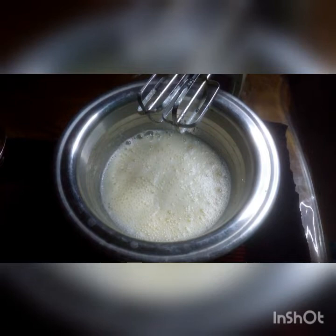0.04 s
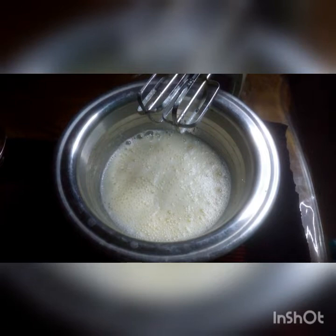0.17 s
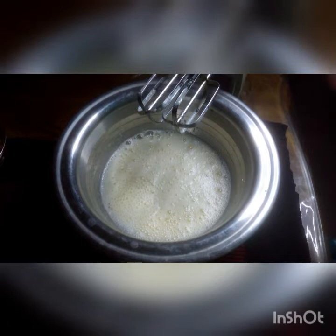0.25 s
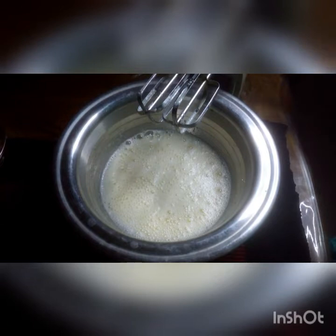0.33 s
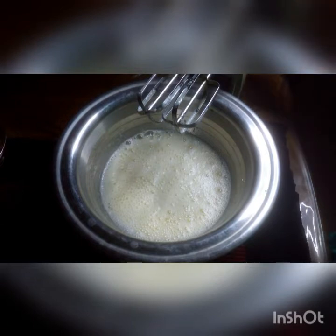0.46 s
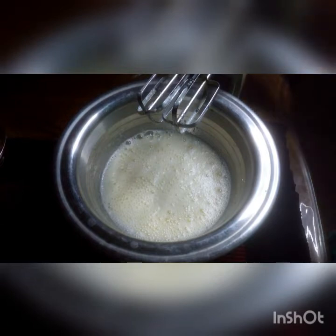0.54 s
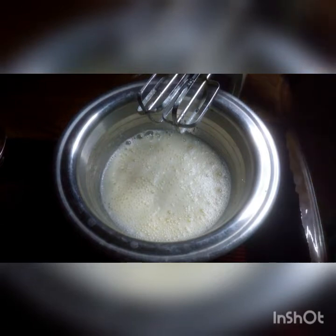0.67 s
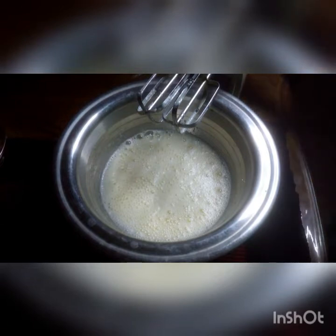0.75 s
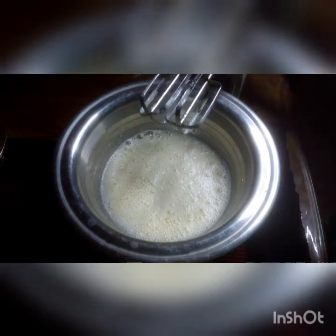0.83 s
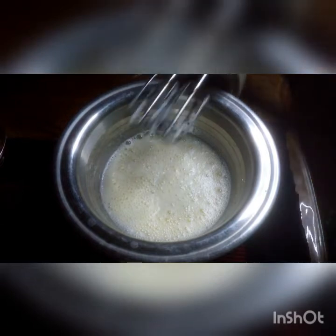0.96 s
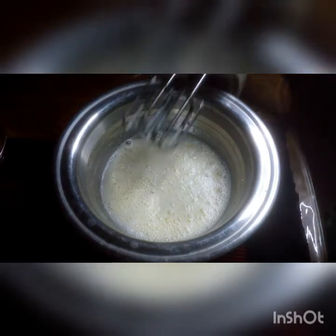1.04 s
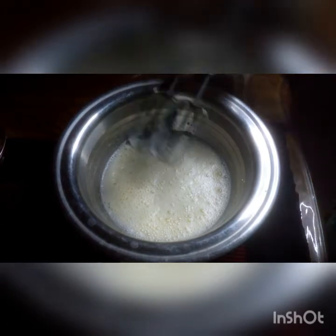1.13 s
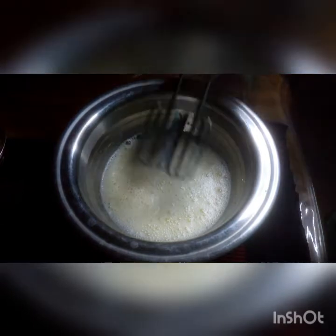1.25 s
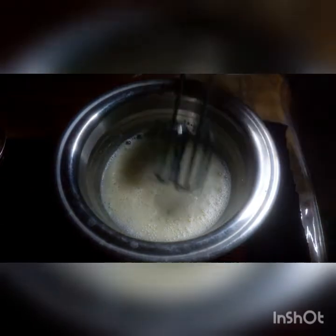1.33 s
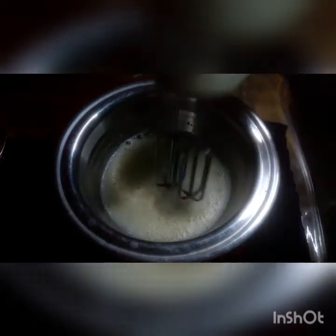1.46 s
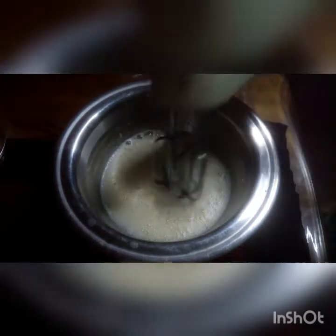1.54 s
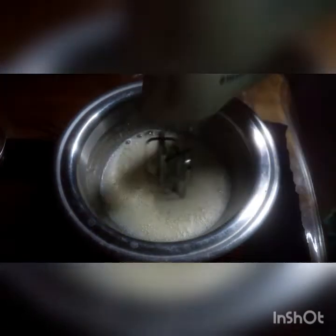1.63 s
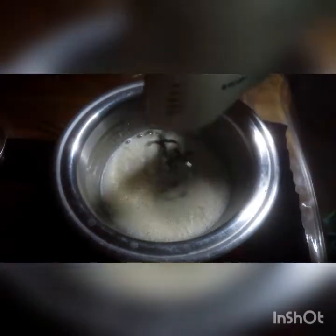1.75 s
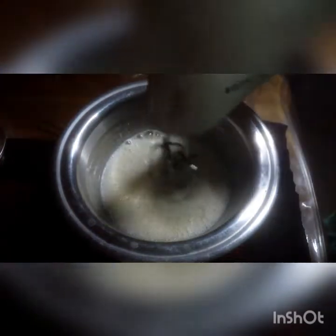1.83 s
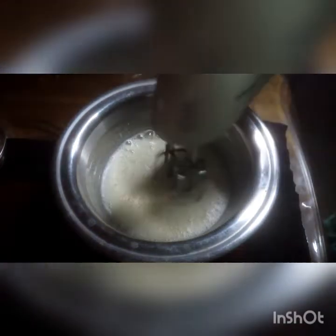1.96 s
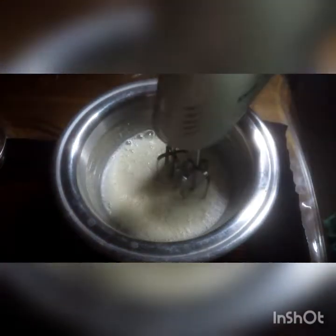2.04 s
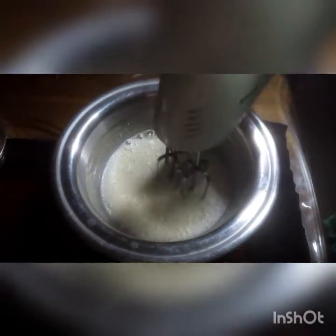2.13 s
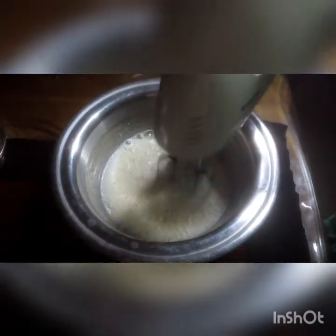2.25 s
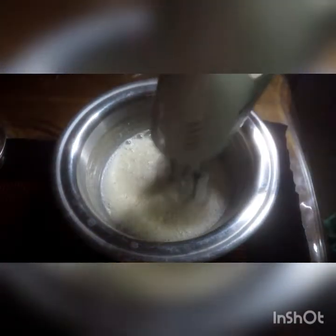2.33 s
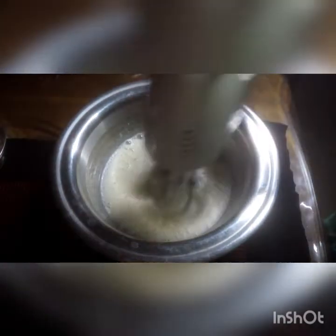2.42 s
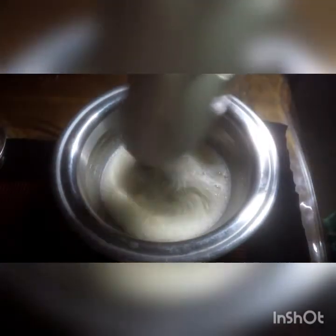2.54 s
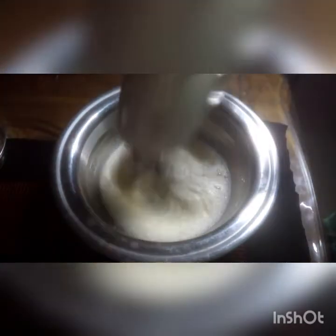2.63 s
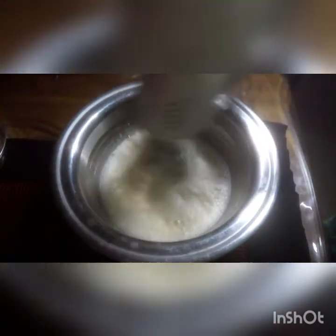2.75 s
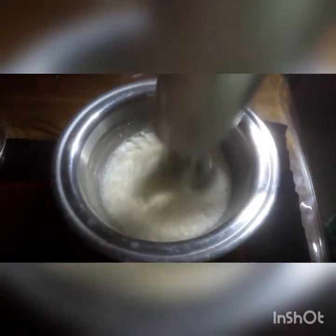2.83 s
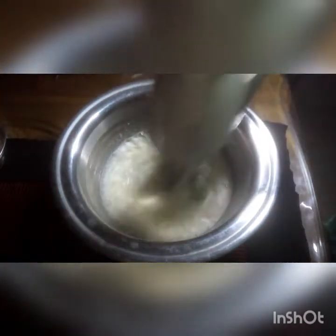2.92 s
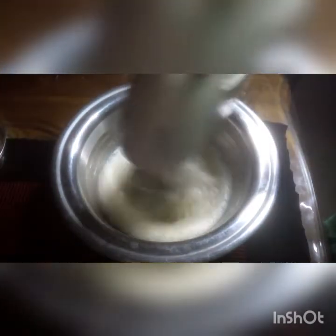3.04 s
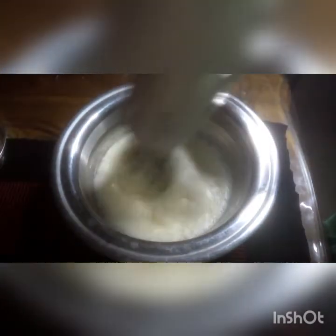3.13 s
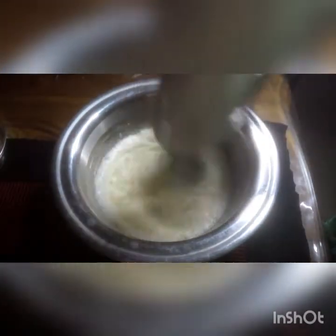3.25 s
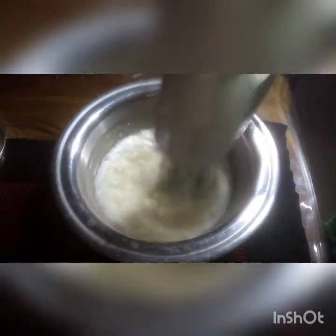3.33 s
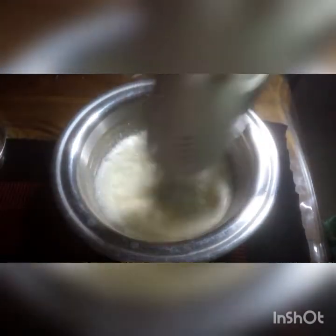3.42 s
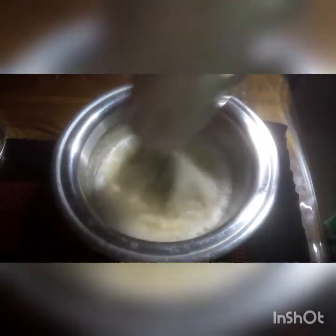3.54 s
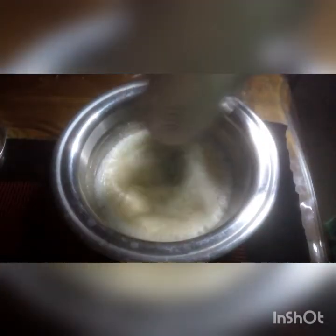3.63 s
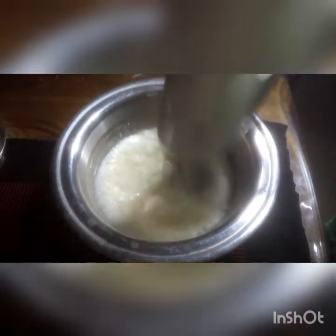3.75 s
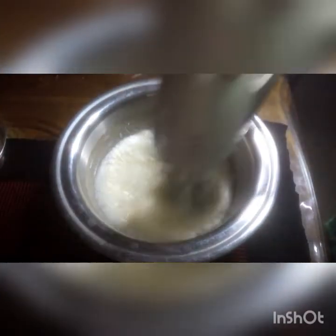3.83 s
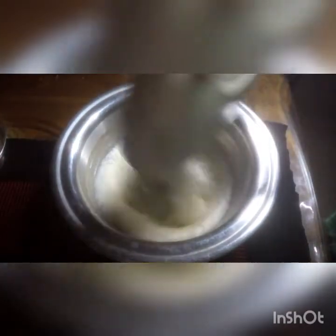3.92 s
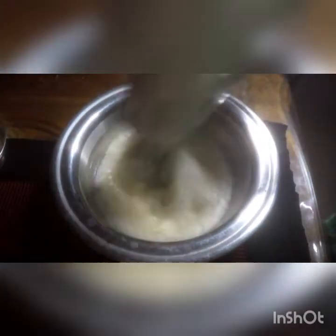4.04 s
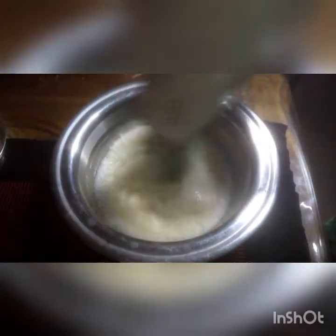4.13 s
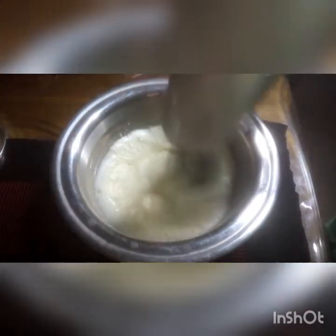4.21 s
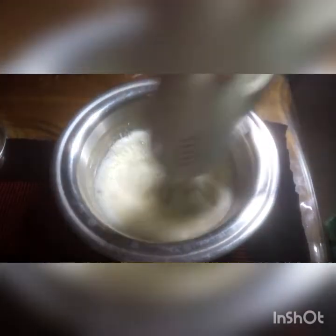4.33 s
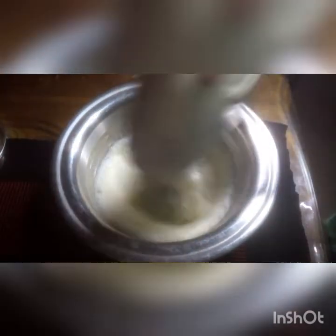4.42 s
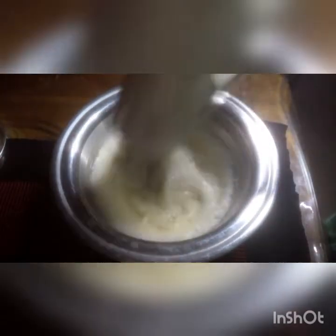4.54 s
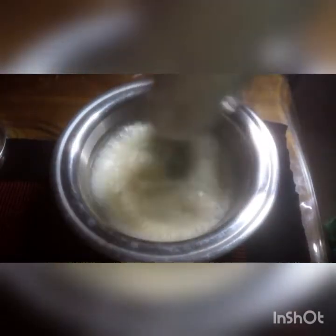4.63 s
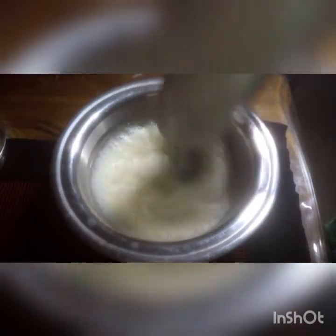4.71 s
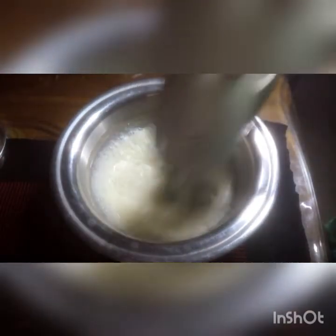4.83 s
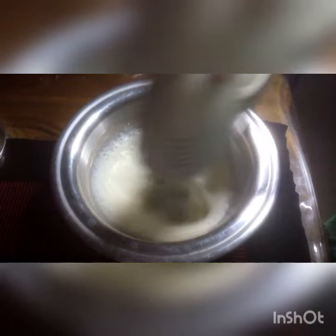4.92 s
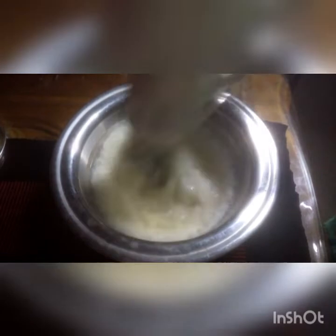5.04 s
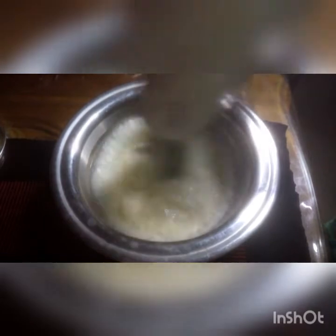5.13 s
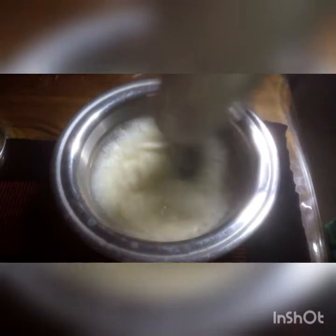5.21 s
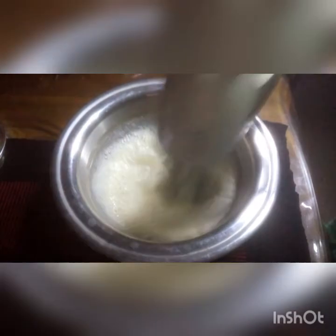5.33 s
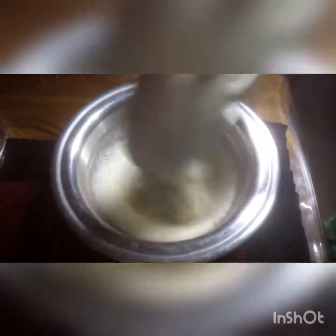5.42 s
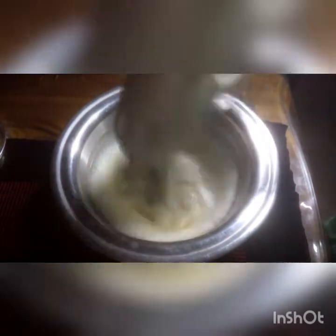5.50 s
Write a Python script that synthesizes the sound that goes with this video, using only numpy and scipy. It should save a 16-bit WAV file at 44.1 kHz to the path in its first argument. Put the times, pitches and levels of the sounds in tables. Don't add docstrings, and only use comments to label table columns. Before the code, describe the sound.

A quiet kitchen with a faint low hum, heard close by a phone, brighter on the left. Right at the start comes a short knock, then small latch clicks and little squeaky rings at about 0.2 to 0.3 s. Soft sleeve and cable rustle and dull bumps through the counter follow sparsely until about 1.9 s, with faint thin singing of beater wires. At 1.94 s the beaters land on the steel bowl with a solid clunk, then more clatter and a low rocking to 2.25 s. Around 2.3 s a hard switch snap, the loudest knock, starts the motor: a rough buzzing whine leaps upward, then climbs more slowly to near full speed by about 4 s. The roar of gear rattle, churned runny batter and cooling air stays loud, with hissy treble, hollow howling and whine tones wavering as the mixer moves. It is still running at the end, about 5.6 s.

```python
import sys
import numpy as np
from scipy import signal
from scipy.fft import rfft, irfft
from scipy.io import wavfile
from scipy.ndimage import uniform_filter1d

SR = 44100
rng = np.random.default_rng(int(sys.argv[2]) if len(sys.argv) > 2 else 0)


def digitize_waveform(pressure):
    field = np.atleast_2d(pressure).T
    bounded = np.clip(field, -1, 1)
    quanta = np.round(bounded * 32767).astype(np.int16)
    wavfile.write(sys.argv[1], SR, quanta)


def boost_factor(decibels):
    exponent = np.asarray(decibels, float) / 20
    return 10 ** exponent


N = 245637
T = np.arange(N) / SR
HZ = np.fft.rfftfreq(N, 1 / SR)

BLADES, SLOTS = 9, 12
MAINS_HZ, START_S, FULL_HZ = 50, 2.33, 354.7
JOLT_S, JOLT_RISE_DB_S, JOLT_FALL_DB_S = 2.31, 523, 173
TOP_HZ, LEAD_S = 15550, 4.5e-5

# (frequency [Hz], density [dB per Hz])
KITCHEN_SHAPE = [(15, -49), (40, -8), (60, -1), (226, 0.5), (347, -15), (376, -12), (678, -25), (887, -50),
                 (1010, -16), (1130, -50), (4560, -30), (15200, -58)]
# (frequency [Hz], density [dB per Hz])
RUSTLE_SHAPE = [(180, 0.5), (300, 4), (404, -2), (553, 1), (1190, -5), (1940, -6.5), (3620, -10),
                (4810, -10.5), (9000, -31.5), (11700, -65), (19800, -120)]
# (frequency [Hz], width [Hz], level [dB])
SCRAPE_MODES = [(537, 59, -2), (1440, 210, 0), (2500, 140, -7), (4850, 120, -8)]
# (time [s], length [s], level [dB])
STROKES = [(0.04, 0.18, -61), (.27, 0.12, -62), (.71, 0.067, -58.5), (1.4, 0.05, -64.5),
           (1.55, 0.07, -58.5), (1.68, 0.059, -57.5), (1.94, 0.26, -60.5)]
# (time [s], length [s], level [dB])
BUMPS = [(0, .01, -55), (.05, 0.12, -53.5), (.27, 0.18, -51.5), (.73, 0.1, -52), (.9, 0.26, -55),
         (1.25, 0.02, -55), (1.38, 0.13, -55.5), (1.56, 0.088, -53.5), (1.86, 0.014, -55),
         (1.95, 0.18, -50.5), (2.24, .1, -51)]
# (frequency [Hz], width [Hz], level [dB])
COUNTER_MODES = [(116, 20, -5), (172, 27, 1), (226, 38, -8.5), (347, 39, -17)]
# (frequency [Hz], frequency [Hz])
WIRES_HZ = (5790, 3257)
# (time [s], length [s], level [dB])
SING_HIGH = [(1.245, 0.12, -70), (1.41, .06, -76), (1.79, 0.065, -74), (1.89, .02, -74), (2.0, .1, -82)]
# (time [s], length [s], level [dB])
SING_LOW = [(1.76, .03, -82), (1.86, .24, -77)]
# (time [s], peak [dB], thud [Hz], crack [dB])
KNOCKS = [(0.05, -59, 1750, -8), (0.0598, -26.5, 1310, -12), (0.182, -53, 1710, 5),
          (0.1845, -41.5, 2000, -0.5), (0.219, -58, 1500, -1), (0.2765, -49, 2400, 8),
          (0.285, -62, 2400, 0), (0.304, -55, 1810, -7), (0.313, -55, 497, 2), (0.327, -59, 497, 4),
          (1.887, -51, 700, -17), (1.915, -53, 549, -30), (1.931, -39, 1170, -19), (1.942, -20.5, 774, -18),
          (2.033, -30.5, 620, -20), (2.049, -37, 1150, -17), (2.132, -48, 1410, -16),
          (2.142, -34.5, 1380, -9.5), (2.17, -44, 850, -19), (2.247, -34.5, 800, -24),
          (2.27, -32.5, 726, -1), (2.288, -26.5, 714, -25), (2.299, -15, 1180, -16),
          (2.304, -18, 1100, -14), (2.309, -9, 662, -21.5)]
# (time [s], peak [dB])
TICKS = [
    (0.184, -48),
    (0.275, -51),
    (1.943, -62),
]
# (time [s], frequency [Hz], level [dB], t60 [s])
SQUEAKS = [(0.0, 1750, -65, .4), (0.186, 10300, -63, .12), (0.186, 11200, -67, .12),
           (0.186, 13700, -66, .05), (0.279, 10200, -67, 0.1), (0.279, 11000, -71, 0.1),
           (0.2, 2470, -64, 0.3), (0.279, 2440, -61, 0.41), (.285, 1670, -58, .25), (.29, 920, -62, .3),
           (.303, 1500, -61, .3), (.305, 1900, -57, .08), (.33, 410, -55, .2), (0.69, 4740, -57, 0.16),
           (2.033, 5520, -56, 0.035), (2.143, 3150, -47, 0.033)]
# (frequency [Hz], level [dB], t60 [s])
LATCH_MODES = [(480, -14, .12), (900, -10, .14), (1340, -4, .07), (1475, -9, .12), (1750, -14, .1),
               (2200, -1, .035), (2400, -9, .1), (2700, -3, .025), (3257, 2, .035), (3700, 4, .022),
               (4290, -2, .03), (5701, -13, .025), (6300, -15, .05)]
# (frequency [Hz], level [dB], t60 [s])
STEEL_MODES = [(563, -6.5, 0.28), (634, -9, 0.1), (820, -13, 0.07), (1060, -7, 0.039), (1518, -14, 0.092),
               (2170, -13.5, 0.25), (3300, -23, 0.18), (5110, -15, 0.064), (5840, -24, .12),
               (6600, -20, .07)]
# (frequency [Hz], width [Hz], level over roar [dB])
HOUSING_MODES = [(157, 15, 4.5), (297, 36, -2.5), (430, 33, -2.5), (547.5, 19, 5.5), (651, 38, 7),
                 (712, 18, -1), (1104, 108, 8), (1942, 65, -1), (2576, 166, 7), (3063, 190, 5.5)]
# (time [s], length [s], level [dB])
ROCKS = [(1.95, .02, -52), (1.99, .03, -51), (2.04, 0.064, -53.5), (2.14, .08, -56)]
# (frequency [Hz], width [Hz], level [dB])
BRUSH_BANDS = [(9000, 880, -59), (10400, 1800, -58.5), (11470, 1100, -60.5), (12270, 1100, -60.5),
               (13230, 1000, -57), (14400, 1000, -61), (14800, 500, -64.5), (15330, 300, -69)]
# (level at full speed [dB], slope [dB per octave of speed], starting jolt [dB])
ROAR_LAYERS = [
    (-27, 9.5, -32.5),
    (-26, 10.5, -30.5),
    (-28, 16, -42),
    (-29, 18, -37.5),
]
# (frequency [Hz], density [dB per Hz])
ROAR_SHAPE = [(18, -54), (30, -25.5), (304, -5.5), (342, -8), (386, -7.5), (652, -7), (932, -10.5),
              (1080, -6.5), (2200, -6), (3070, -5.5), (3630, -10.5), (6290, -16), (9000, -42.5),
              (11700, -64), (19800, -120)]
# (speed missing [Hz], time constant [s])
SPIN_LAGS = [
    (108, .095),
    (170.6, .6),
]
# (level at full speed [dB], slope [dB per octave of speed], current gain [dB per unit])
TONE_LAWS = [
    (-33, 12, 10.5),
    (-41.5, 5.5, 7),
    (-50.5, 14, 43.5),
    (-66.5, 7, 28),
]
# (shaft multiple [-], level at full speed [dB])
OVERTONES = [(2, -42), (4, -44), (11, -52), (13, -60), (16, -58), (18, -62), (23, -76), (25, -74),
             (27, -76), (28, -76), (29, -74), (30, -74)]
# (frequency [Hz], width [Hz], level [dB])
CASING_MODES = [(292, 73, 8.5), (2510, 560, 14.5), (3030, 470, 13.5)]
# (frequency [Hz], width [Hz], level [dB])
CORE_MODES = [(2700, 370, 19.6), (3100, 250, 16), (3540, 520, 3.6), (4317, 160, 5.6), (5230, 720, 15.6),
              (6560, 1200, 9.5)]
# (frequency [Hz], width [Hz], level [dB])
UPPER_CORE_MODES = [(3500, 500, 5), (4250, 300, 11), (5250, 500, 13), (6560, 1200, 5)]
# (time [s], shaft [dB], fan [dB], slot [dB])
TONE_DRIFTS = [(2.36, -18, -11, 5), (2.42, -15, -4, 5), (2.48, -9, -8, -4), (2.52, -2, -3, -1.5),
               (2.6, -4, -12, -1), (2.66, 6, -12, -0.5), (2.8, -3, -2.5, -0.5), (2.95, -3, -4.5, -4),
               (3.04, 5, -10.5, 0), (3.15, -5.5, -7, 0), (3.3, 6, -1.5, 1), (3.47, -5, 1.5, 1), (3.62, 2.5, 2, 3),
               (3.75, 4.5, 0.5, -3), (3.9, -2, -5, 4), (4.05, -3, -10, 3), (4.16, 2, -6, 1), (4.23, 2, 3.5, -2),
               (4.33, 4, -1, 2), (4.45, -2, -3.5, 8), (4.6, 3, -1, 6), (4.72, 3, -2, 1), (4.82, 0, -7, 10),
               (4.92, -2, -6, 8.5), (5.0, -5, -4, 2), (5.1, 2, -7, 3.5), (5.2, 2, -2, 3.5), (5.35, -2, -7, 10),
               (5.47, -3, -5, 5), (5.55, -2, -6, -4)]
# (frequency [Hz], width [Hz])
CAVITIES = [(2590, 94), (3110, 130)]
# (time [s], lower cavity [dB], upper cavity [dB])
HOWL_LEVELS = [(2.7, -60, -60), (2.9, -37, -52), (3.2, -32, -45), (3.4, -38, -45), (4.0, -46, -33),
               (4.5, -38, -33.5), (4.8, -44, -38), (4.95, -44, -28), (5.05, -46, -36), (5.2, -47, -31),
               (5.4, -49, -35), (5.57, -46, -33)]
# (frequency [Hz], correlation [-1..1])
LIKENESS = [(60, 0.91), (130, 0.97), (290, 0.72), (640, 0.82), (1400, 0.69), (3070, 0.72), (6730, -0.35),
            (14800, -0.16)]
# (frequency [Hz], level [dB])
LEFT_BIAS = [(60, 0.6), (110, 3), (200, 1.5), (380, 0), (690, 3.5), (1280, 2), (2360, 7), (4350, 10),
             (8020, 13.5), (14800, 43)]


def across(points):
    hz, value = np.transpose(points)
    return np.interp(np.log(HZ + 1), np.log(hz), value)


def unit(x):
    return x / np.sqrt(np.mean(x ** 2))


def shaped(gain):
    return unit(irfft(rfft(rng.standard_normal((2, N))) * gain, N))


def peaks(modes, at=HZ):
    return sum(boost_factor(2 * db) / (1 + (2 * (at - hz) / width) ** 2) ** 2 for hz, width, db in modes)


def resonant(modes):
    return shaped(np.sqrt(peaks(modes)))


def walk(rate_hz):
    hold = int(SR / rate_hz)
    steps = np.repeat(rng.standard_normal(N // hold + 1), hold)
    return 0.96 * uniform_filter1d(uniform_filter1d(steps, hold), hold)[:N]


def swells(table, rise_db_s, fall_db_s, rest_db):
    level = np.full(N, rest_db, float)
    for s, hold_s, db in table:
        rise_db = rise_db_s * np.maximum(s - T, 0)
        fall_db = fall_db_s * np.maximum(T - s - hold_s, 0)
        level = np.maximum(level, db - rise_db - fall_db)
    return level


def echoes(x, t60):
    t = T[:int(t60 * SR)]
    tail = rng.standard_normal(len(t)) * boost_factor(-60 * t / t60)
    return signal.fftconvolve(x, tail / np.sqrt(np.sum(tail ** 2)))[:N]


def scattered(x):
    return np.array([x, echoes(x, 0.2)])


def band(order, low_hz, high_hz, x):
    return signal.sosfilt(signal.butter(order, (low_hz, high_hz), "band", fs=SR, output="sos"), x)


def kitchen():
    return boost_factor(-61) * shaped(boost_factor(across(KITCHEN_SHAPE))) + boost_factor(-84) * shaped(HZ > 7000)


def wires():
    out = np.zeros(N)
    for sing, hz in zip((SING_HIGH, SING_LOW), WIRES_HZ):
        level_db = swells(sing, 900, 400, rest_db=-120) + 4.5 * walk(60)
        out += boost_factor(level_db) * np.sin(2 * np.pi * hz * T + 2.2 * walk(90))
    return np.sqrt(2) * scattered(out)


def handling():
    fade = np.clip((2.36 - T) / 0.07, 0, 1)
    rustle_db = swells(STROKES, 164, 77, rest_db=-68.5) + 0.75 * walk(59.2)
    bump_db = swells(BUMPS, 200, 240, rest_db=-73)
    rustle = boost_factor(rustle_db) * shaped(boost_factor(across(RUSTLE_SHAPE)) * np.sqrt(1 + peaks(SCRAPE_MODES)))
    bumps = boost_factor(bump_db) * resonant(COUNTER_MODES)
    return fade * (rustle + bumps + wires())


def struck_ring(s, t, grit):
    if s < 1:
        modes, ring_db = LATCH_MODES, -9
    elif 1.935 < s < 2.1:
        modes, ring_db = STEEL_MODES, -14
    else:
        modes = [(hz, db - 7, min(3 / width, .04)) for hz, width, db in HOUSING_MODES]
        ring_db = -13
    ring = np.zeros(len(t))
    jitter = 1 + 0.02 * np.cumsum(grit)
    for hz, db, t60 in modes:
        loss, phase = rng.random(2)
        ring += boost_factor(ring_db + db - 1.4 * loss - 60 * t / t60) * np.sin(2 * np.pi * (hz * t + phase * jitter))
    n = 600
    contacts = np.abs(grit[:n]) * (np.arange(n) % 97 == 0) / 3 + (t[:n] == 0)
    scuff = contacts * boost_factor(-60 * t[:n] / 0.018)
    return signal.fftconvolve(ring, scuff / np.sqrt(np.sum(scuff ** 2)))[:len(t)]


def knock(s, thud_hz, crack_db, t):
    grit = rng.standard_normal(len(t))
    thud_db = -12 - 0.63 * crack_db
    tone = np.sin(2 * np.pi * thud_hz * t + 0.05 * np.cumsum(grit))
    thud = (tone + 0.9 * band(3, 250, 1800, grit)) * boost_factor(thud_db - 1.0 - 60 * t / 0.029)
    crack_top_hz = 6300 if s < 1 else 7000
    crack = band(7, 1600, crack_top_hz, grit) * boost_factor(crack_db + 4 - 60 * t / .02)
    blow = (thud + crack + struck_ring(s, t, grit)) * np.minimum(t / 0.0012, 1)
    return band(4, 330, 8200, blow)


def tick(t):
    decay = boost_factor(-10.5 - 60 * t / 0.063) * (1 + 4 * boost_factor(-600 * t / 0.031))
    return band(2, 7000, 15300, rng.standard_normal(len(t))) * decay


def squeak(hz, t60, t):
    quiver = np.cumsum(rng.standard_normal(len(t))) * hz * 2.2e-5
    return boost_factor(-60 * t / t60) * np.sin(2 * np.pi * hz * t + quiver)


def knocks():
    t = T[:SR // 2]
    events = [(s, db, knock(s, thud_hz, crack_db, t)) for s, db, thud_hz, crack_db in KNOCKS]
    events += [(s, db, tick(t)) for s, db in TICKS]
    events += [(s, db, squeak(hz, t60, t)) for s, hz, db, t60 in SQUEAKS]
    out = np.zeros(N + SR)
    for s, db, sound in events:
        start = int(s * SR)
        out[start:start + len(t)] += boost_factor(db) * sound
    direct = out[:N]
    tail = boost_factor(-7.0) * np.array([echoes(direct, 0.42), echoes(direct, 0.51)])
    return np.array([direct, echoes(direct, 0.022)]) + tail


def bowl_rocking():
    return boost_factor(swells(ROCKS, 600, 300, rest_db=-120)) * resonant([(95, 60, 0)])


def shaft_hz():
    since = T - START_S
    missing_hz = sum(hz * np.exp(-np.maximum(since, 0) / lag_s) for hz, lag_s in SPIN_LAGS)
    return np.where(since < 0, 0, FULL_HZ - missing_hz)


def octaves(hz):
    return np.log2(np.maximum(hz, 1e-3) / FULL_HZ)


def brushes():
    spark = boost_factor(swells([(JOLT_S - .01, .02, -7.5)], 900, 127, rest_db=-200))
    hiss = sum(boost_factor(db + 2.0 * walk(30)) * resonant([(hz, width, 0)]) for hz, width, db in BRUSH_BANDS)
    return np.hypot((shaft_hz() / FULL_HZ) ** 2.44, spark) * hiss


def roar():
    colour = boost_factor(across(ROAR_SHAPE)) * np.sqrt(1 + peaks(HOUSING_MODES))
    below = [0, *(1 / (1 + (HZ / edge_hz) ** 8) for edge_hz in (900, 1900, 3400)), 1]
    splash_db = 1.2 * walk(70)
    jolt = boost_factor(swells([(JOLT_S, 0, 0)], JOLT_RISE_DB_S, JOLT_FALL_DB_S, rest_db=-200))
    slow = octaves(shaft_hz())
    out = np.zeros((2, N))
    for (db, slope_db, jolt_db), lower, upper in zip(ROAR_LAYERS, below, below[1:]):
        level = np.hypot(boost_factor(db + slope_db * slow), boost_factor(jolt_db) * jolt)
        flutter_db = splash_db + 0.34 * walk(24.92) + 1.05 * walk(3.175)
        out += level * boost_factor(flutter_db) * shaped(colour * np.sqrt(upper - lower))
    return out


def tone_levels(hz, load):
    at, *drifts = np.transpose(TONE_DRIFTS)
    multiples = (1, BLADES, SLOTS, 2 * SLOTS)
    bodies = (CASING_MODES, CASING_MODES, CORE_MODES, UPPER_CORE_MODES)
    drifts = (*drifts, 0 * at)
    sways_db = (.8, .8, 1.8, 4.5)
    levels = []
    for k, body, law, drift_db, sway_db in zip(multiples, bodies, TONE_LAWS, drifts, sways_db):
        db, slope_db, pull_db = law
        drive_db = db + slope_db * octaves(hz) + pull_db * load
        body_db = 10 * np.log10(1 + peaks(body, k * hz))
        levels.append(drive_db + body_db + np.interp(T, at, drift_db) + sway_db * walk(6.99))
    return levels


def whine():
    hz = shaft_hz()
    turn = 2 * np.pi * np.cumsum(hz * (1 + 0.000974 * walk(25.21))) / SR
    load = np.clip(1 - hz / 370, 0, 1)
    shaft_db, fan_db, slot_db, double_db = tone_levels(hz, load)
    mains = 4 * np.pi * MAINS_HZ * T + 1.9
    throb = 1 + 1.8 * load * np.cos(mains)
    lurch = 0.2 * load * np.sin(mains)

    tones = boost_factor(shaft_db - 3.0 + 2.7 * walk(22.24)) * np.sin(turn + 0.34 * walk(30))
    for k, db in OVERTONES:
        tones += (hz / 350) ** 2 * boost_factor(db + 4.5 * walk(16)) * np.sin(k * turn)

    rub = 1.5 * walk(260)
    slot = boost_factor(slot_db) * np.sin(SLOTS * turn + lurch + 0.2 * rub)
    double = np.sin(2 * SLOTS * turn + 2 * lurch + 0.9 * rub)
    triple = load ** 3 * np.sin(3 * SLOTS * turn + rub)
    tones += throb * (slot + boost_factor(double_db - 2.5 + 5.0 * walk(28)) * (double + triple))

    blur = (.65 + 1.8 * load) * walk(110)
    tones += boost_factor(fan_db + 4 * walk(35)) * np.sin(BLADES * turn + blur)
    return np.sqrt(2) * scattered(tones)


def howl():
    at, *levels = np.transpose(HOWL_LEVELS)
    out = np.zeros((2, N))
    for (hz, width), db in zip(CAVITIES, levels):
        level_db = np.interp(T, at, db, left=-120) + 2.35 * walk(30)
        out += boost_factor(level_db) * resonant([(hz, width, 0)])
    return out


def ports(direct, diffuse):
    size = 2 * N
    hz = np.fft.rfftfreq(size, 1 / SR)
    like = np.interp(hz, HZ, np.clip(across(LIKENESS), 0, 1))
    bias = np.interp(hz, HZ, boost_factor(across(LEFT_BIAS)))
    left = rfft(direct, size)
    lead = np.exp(2j * np.pi * hz * LEAD_S)
    right = (like * lead * left + np.sqrt(1 - like ** 2) * rfft(diffuse, size)) / bias
    middle = np.sqrt(1 + 2 * like / bias + bias ** -2) / 2
    return irfft(np.array([left, right]) / middle, size)[:, :N]


def scene():
    before = kitchen() + handling() + knocks() + bowl_rocking()
    running = brushes() + roar() + whine() + howl()
    return ports(*(before + running))


def gate(x):
    hz, _, z = signal.stft(x, SR, nperseg=1024)
    patch = uniform_filter1d(uniform_filter1d(np.abs(z) ** 2, size=6, axis=1), size=3, axis=2)
    top = (hz > 7600) & (hz < TOP_HZ)
    keep = (patch > .52 * patch[:, top].mean(axis=1, keepdims=True)) | ~top[:, None]
    return signal.istft(z * keep, SR, nperseg=1024)[1][:, :N]


def band_limit(x):
    return signal.sosfilt(signal.butter(12, 15550, fs=SR, output="sos"), x)


def record(dry):
    low_pass = signal.ellip(10, .2, 70, TOP_HZ, fs=SR, output="sos")
    mix = gate(signal.sosfilt(low_pass, dry))
    return band_limit(mix)


dry = scene()
out = record(dry)
digitize_waveform(out)
```